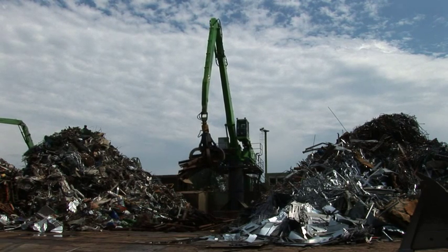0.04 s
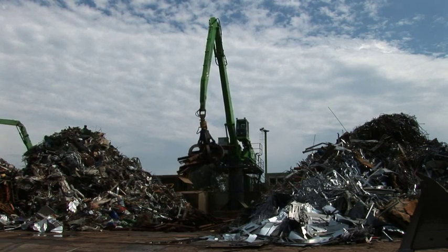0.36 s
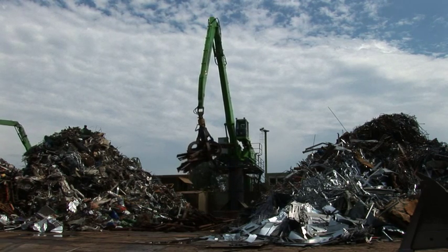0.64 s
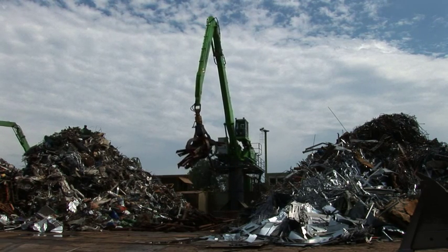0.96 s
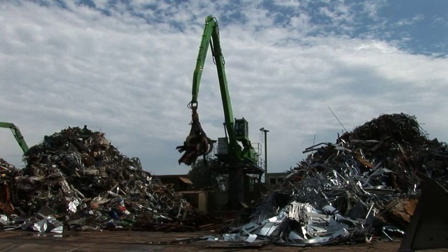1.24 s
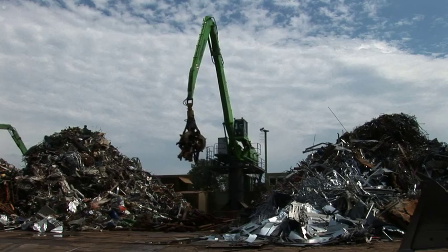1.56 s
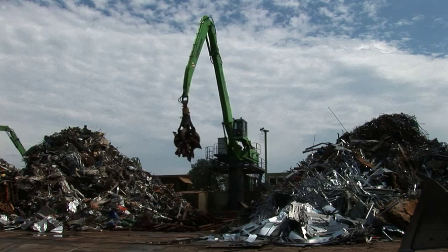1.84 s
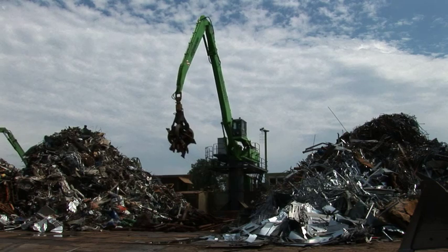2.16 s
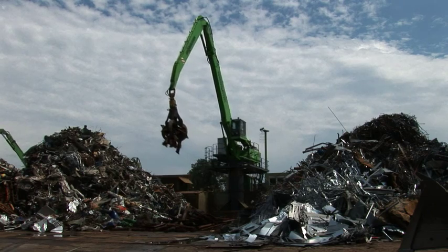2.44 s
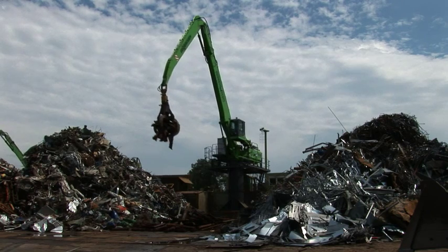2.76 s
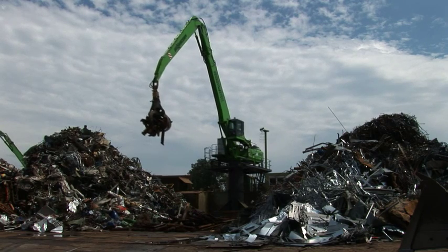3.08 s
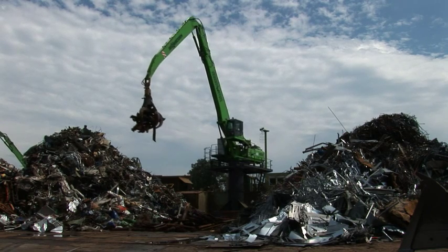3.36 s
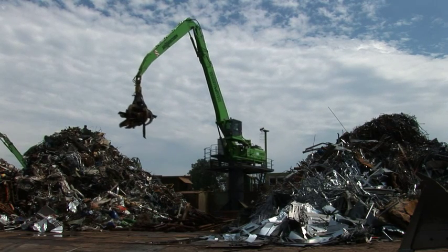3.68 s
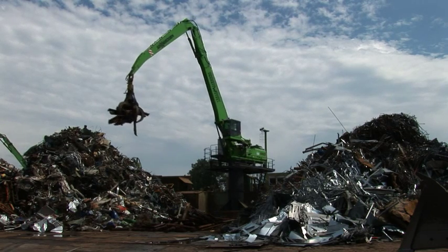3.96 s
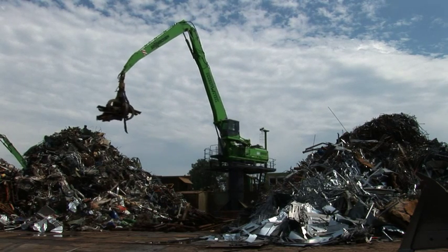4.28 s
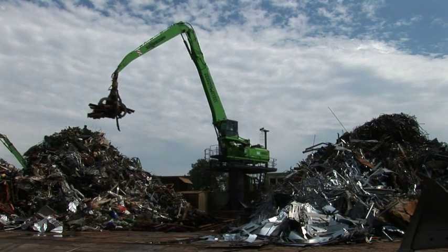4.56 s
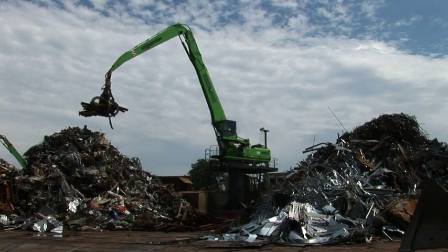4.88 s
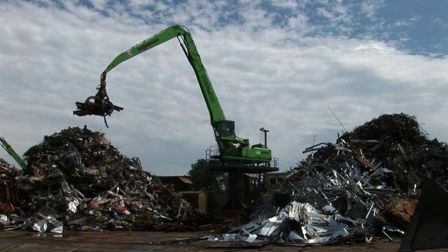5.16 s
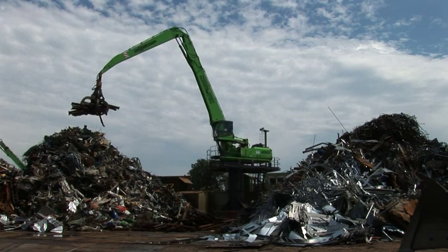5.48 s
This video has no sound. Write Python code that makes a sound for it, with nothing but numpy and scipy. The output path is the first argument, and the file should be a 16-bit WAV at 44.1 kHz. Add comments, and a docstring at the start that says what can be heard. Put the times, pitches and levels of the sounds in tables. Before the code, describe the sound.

Far-off scrap metal shifts with a few clanks and dull thuds over the steady low hum of a grab crane and the thin whine of its hydraulics. Then steel tumbles closer by, left of the microphone, building to a clattering crash with hollow knocks. The last pieces rattle and squeak into place while the machine keeps running in the open yard.

```python
"""Material handler in a scrapyard.

An electric handler swings its grab: the drive hums, the hydraulics whine. Scrap rustles far off,
then a nearer load on the left clanks, slides down in a long crash and settles. Random contacts
ring the modes of loose steel; the heaps scatter the sound to a closely spaced microphone pair."""
import sys
import numpy as np
from scipy import signal
from scipy.fft import rfft, irfft, next_fast_len
from scipy.io import wavfile
from scipy.ndimage import uniform_filter1d

SR = 44100
rng = np.random.default_rng(int(sys.argv[2]) if len(sys.argv) > 2 else 0)


def dump(signal):
    """Clip the signal to [-1, 1] and save it as 16-bit WAV at the path in sys.argv[1]."""
    limited = np.clip(np.atleast_2d(signal).T, -1, 1)
    pcm = np.round(limited * 32767).astype(np.int16)
    wavfile.write(sys.argv[1], SR, pcm)


N = 243431
TIME_S = np.arange(N) / SR
FFT_SIZE = next_fast_len(N + SR)
FREQ_HZ = np.arange(FFT_SIZE // 2 + 1) * SR / FFT_SIZE


def from_db(db):
    """Decibels to gain."""
    return 10 ** (np.asarray(db) / 20)


def unit_rms(x):
    """Scale to rms 1."""
    return x / np.sqrt(np.mean(x ** 2) + 1e-20)


def in_time(rows):
    """Each column of a curve at every sample."""
    time_s, *columns = np.transpose(rows)
    return [np.interp(TIME_S, time_s, c) for c in columns]


def in_frequency(rows):
    """Each column of a spectrum at every FFT bin."""
    hz, *columns = np.transpose(rows)
    return [np.interp(np.log(FREQ_HZ + 1), np.log(hz), c) for c in columns]


def filtered(x, response):
    """Apply a frequency response."""
    return irfft(rfft(x, FFT_SIZE) * response, FFT_SIZE)[..., :N]


def coloured(x, spectrum):
    """Shape x at unit power gain for white input; cut an octave above the last row."""
    level_db, = in_frequency(spectrum)
    return filtered(x, unit_rms(from_db(level_db) * (FREQ_HZ < spectrum[-1][0] * 2)))


def shelf(x, db, hz, kind):
    """Low or high shelf; its gain may vary in time."""
    band = signal.sosfiltfilt(signal.butter(2, hz, kind, fs=SR, output="sos"), x, padtype=None)
    return x + (from_db(db) - 1) * band


def add(out, start, sound):
    """Mix in from sample index start."""
    part = sound[..., :N - start]
    out[..., start:start + part.shape[-1]] += part


def drift(rate_hz):
    """Slow random wander, unit rms."""
    hop, warm_up = 40, 2000
    pole = np.exp(-2 * np.pi * rate_hz * hop / SR)
    noise = rng.standard_normal(N // hop + warm_up + 2)
    slow = signal.lfilter([1], [1, -2 * pole, pole * pole], noise)[warm_up:]
    return np.interp(np.arange(N) / hop, np.arange(len(slow)), unit_rms(slow))


def arch(start_s, length_s):
    """Rounded swell with a broad top."""
    progress = np.clip((TIME_S - start_s) / length_s, 0, 1)
    return np.sin(np.pi * progress).clip(0) ** 0.41


def tone(hz, db, waver_hz, flutter_db):
    """Sine wavering in pitch and level."""
    phase = 2 * np.pi * np.cumsum(hz + waver_hz * drift(9.9)) / SR
    return np.sqrt(2) * from_db(db + flutter_db * drift(19)) * np.sin(phase)


def microphones(pair, direction):
    """Shared and scattered signals to left and right."""
    coherence, lead_rad, balance_db = in_frequency(direction)
    # long waves reach both microphones alike and in phase
    coherence = np.clip(coherence, .99 / (1 + (FREQ_HZ / 480) ** 4), 1)
    lead_rad = lead_rad * np.minimum(FREQ_HZ / 440, 1) ** 4
    sides = np.array([[1], [-1]])
    ports = from_db(sides * balance_db / 2) * np.exp(sides * .5j * lead_rad) / np.sqrt(2)
    shared = filtered(pair[0], ports * np.sqrt(1 + coherence))
    scattered = filtered(pair[1], ports * sides * np.sqrt(1 - coherence))
    return shared + scattered


# pair response to the whole yard: (frequency [Hz], coherence [0-1], left lead [rad], left - right [dB])
FROM_YARD = [(275, 0.21, 4.5, 1), (446, 0.98, -0.46, -4.5), (510, 0.085, 0.3, 2.5), (800, 1, 2, 1),
             (950, 0.44, 1, 0.5), (1380, 0.45, 0, 1.5), (2030, 0.81, -1, 1.5), (2980, 1, 0, 0.5),
             (4050, 0.36, 1, -1), (4920, 0.77, 4.5, 1), (5660, 0.73, 3.5, 1.5), (8540, 0.9, 4, 0),
             (10300, 1, 0.5, 0), (13800, 0.48, -1.5, 0)]
# deep rumble, rumble body and din: (frequency [Hz], relative density [dB])
DEEP_SPECTRUM = [(15, -15), (28, -11), (48, 14), (68, 4), (95, 0)]
BODY_SPECTRUM = [(60, -44), (85, -1.5), (125, -0.5), (170, 3), (220, -2.5), (280, -5), (400, -11)]
DIN_SPECTRUM = [(150, -2), (350, 0.5), (700, 2), (1100, -0.5), (1800, -2.5), (3000, -8), (3700, -16),
                (5000, -21), (5900, -23), (7200, -39), (8800, -36), (11000, -39), (15000, -44)]
# rumble swells: (start [s], length [s], deep level [dB], body level [dB])
RUMBLE_SWELLS = [(0.237, 0.83, -60, -35), (1.275, 0.33, -56, -36), (2.948, 0.59, -38, -35),
                 (3.56, 0.34, -60, -35), (4.399, 0.25, -46, -33), (5.142, 0.21, -41, -56)]


def rumble(deep_db=-61, body_db=-38, din_db=-33):
    """Machinery rumble, swelling now and then under the steady din of the yard."""
    deep_power, body_power = from_db(deep_db) ** 2, from_db(body_db) ** 2
    for start_s, length_s, deep_swell_db, body_swell_db in RUMBLE_SWELLS:
        swell = arch(start_s, length_s)
        deep_power += (from_db(deep_swell_db) * swell) ** 2
        body_power += (from_db(body_swell_db) * swell) ** 2
    deep = np.sqrt(deep_power) * coloured(rng.standard_normal((2, N)), DEEP_SPECTRUM)
    body = np.sqrt(body_power) * coloured(rng.standard_normal((2, N)), BODY_SPECTRUM)
    din = from_db(din_db + .7 * drift(1.5)) * coloured(rng.standard_normal((2, N)), DIN_SPECTRUM)
    return microphones(deep + body + din, FROM_YARD)


# high whistle: (time [s], level [dB])
WHISTLE_LEVEL = [(0, -77), (.3, -73), (.5, -78), (1.0, -72), (1.7, -74), (1.85, -83), (2.45, -75),
                 (2.56, -69), (2.75, -77), (2.95, -68), (3.3, -81), (5.52, -70)]


def whistle(centre_hz=8714, half_width_hz=70):
    """Faint, airy band of noise that comes and goes."""
    level_db, = in_time(WHISTLE_LEVEL)
    band = unit_rms(1 / (1 + ((FREQ_HZ - centre_hz) / half_width_hz) ** 2))
    return from_db(level_db + 3.9 * drift(9)) * filtered(rng.standard_normal(N), band)


# drive speed: (time [s], hum frequency [Hz])
DRIVE_SPEED = [(0, 56.64), (.4, 59.2), (1, 61.95), (2, 63.5), (2.7, 64.4), (3.4, 66.7), (4.2, 65.4),
               (5.5, 65.5)]
# drive load: (time [s], hum level [dB])
DRIVE_LOAD = [(0, -42), (.25, -43), (.4, -37.5), (.86, -35.5), (1.1, -40.5), (1.8, -43.5), (2.08, -34),
              (2.3, -38), (2.95, -36.5), (3.08, -43), (3.55, -36.5), (3.7, -51), (4.6, -48), (5.52, -50)]
# upper drive tones: (time [s], drone level [dB], gear level [dB])
DRIVE_TONES = [(0, -58, -62), (.9, -51, -50), (1.05, -38.5, -44.5), (1.3, -45, -46), (1.5, -40, -40.5),
               (1.7, -41.5, -44), (2.1, -40.5, -49.5), (2.9, -41, -44.5), (4.0, -47.5, -50),
               (4.85, -43.5, -53), (5.15, -52, -43), (5.52, -50, -45.5)]
# second motor sags, picks up, drops out, runs again: (time [s], frequency [Hz], level [dB])
SECOND_MOTOR = [(0, 130, -36), (.09, 117.2, -37.5), (.22, 115, -44), (.31, 129.6, -39), (.5, 131, -36.5),
                (.68, 130, -46), (.95, 126.3, -51), (3.15, 132.7, -48), (3.28, 131, -39), (3.45, 123, -38),
                (3.7, 126, -50)]


def handler(gear_ratio=3.42, drone_hz=104):
    """Electric drive hum, a gear tone tied to its speed, a drone and a second motor."""
    speed_hz, = in_time(DRIVE_SPEED)
    hum_db, = in_time(DRIVE_LOAD)
    drone_db, gear_db = in_time(DRIVE_TONES)
    motor_hz, motor_db = in_time(SECOND_MOTOR)
    hum = tone(speed_hz, hum_db, waver_hz=1.7, flutter_db=2) * (1 + 0.23 * drift(35))
    gear = tone(gear_ratio * speed_hz, gear_db, waver_hz=2.24, flutter_db=2.5)
    drone = tone(drone_hz, drone_db, waver_hz=3.58, flutter_db=1.5)
    motor = tone(motor_hz, motor_db, waver_hz=1.2, flutter_db=1.2)
    return hum + gear + drone + motor


# valve and pump tones: (time [s], level [dB])
VALVE_LEVEL = [(0, -50), (1.35, -49), (1.55, -41), (1.92, -44), (2.08, -40), (2.3, -36), (2.52, -40),
               (2.68, -54), (2.85, -44.5), (3.3, -36), (3.9, -46), (4.8, -52), (5.25, -43.5), (5.39, -49),
               (5.46, -42), (5.52, -43)]
PUMP_LEVEL = [(0, -43), (0.8, -43.5), (1.1, -49.5), (1.7, -51), (1.95, -47), (2.5, -47.5), (2.8, -44),
              (3.15, -37), (3.35, -45.5), (3.54, -34.5), (3.68, -35), (4.0, -48), (4.45, -47), (4.66, -42),
              (4.74, -35.5), (4.98, -36), (5.32, -40.5), (5.42, -58), (5.52, -58)]


def hydraulics(valve_hz=1690, pump_hz=294.9):
    """Valve and pump sing as oil flows to move the boom."""
    valve_db, = in_time(VALVE_LEVEL)
    pump_db, = in_time(PUMP_LEVEL)
    valve = tone(valve_hz, valve_db, waver_hz=3, flutter_db=0.8)
    pump = tone(pump_hz, pump_db, waver_hz=1.5, flutter_db=1.2)
    return valve + pump


def yard(echo_db, t60_s=1):
    """Two impulse responses: direct sound with echoes off the heaps, and scatter alone."""
    t = TIME_S[:SR // 2]
    paths = rng.standard_normal((2, len(t))) * (rng.random((2, len(t))) < .05)
    paths *= from_db(-60 * t / t60_s) + 3 * np.exp(-t / 0.0084)  # tail + early echoes
    paths /= np.sqrt(np.sum(paths ** 2, axis=1, keepdims=True))
    direct, echo_gain = t == 0, from_db(echo_db)
    paths[0] = (direct + echo_gain * paths[0]) / np.sqrt(1 + echo_gain ** 2)
    return paths


def across_yard(contacts, response, echo_db):
    """Contacts on one piece, carried across the yard."""
    return signal.fftconvolve(contacts[None], signal.fftconvolve(response[None], yard(echo_db)))


def struck_modes(hz, db, t60_s):
    """Sum of decaying sines of random sign, unit energy."""
    t = TIME_S[:SR // 3, None]
    signs = rng.choice([-1, 1], len(hz))
    blow = np.sum(signs * from_db(db - 60 * t / t60_s) * np.sin(2 * np.pi * hz * t), axis=1)
    return blow / np.sqrt(np.sum(blow ** 2))


# heavy steel in the heap: (frequency [Hz], relative level [dB], T60 [s])
STEEL_MODES = [(387, -0.5, 0.2), (590, 2, 0.4), (683.5, 7, 0.21), (995, -2, 0.36), (1118, 6.5, 0.27),
               (1233, 4, 0.27), (1366, 6, 0.22), (1668, 5.5, 0.2), (1820, -1, 0.33), (2020, 6.5, 0.21),
               (2176, 2.5, 0.63), (2336, 5, 0.45), (2630, -8, 0.073), (2860, 6, 0.16), (3276, -0.5, 0.67)]


def piece(steel_db, own_db, own_t60_s, modes=56):
    """Impulse response of a piece: a crack, its own modes and the heavy steel under it."""
    hz = np.geomspace(800, 12000, modes) * from_db(rng.uniform(-.4, .4, modes))
    mode_db = 10 * np.log10(np.minimum(hz, 3000) / 1000) + rng.normal(0, 1.9, modes)
    t60_s = own_t60_s / (1 + (hz / 3500) ** 2)
    heap_hz, heap_db, heap_t60_s = np.transpose(STEEL_MODES)
    detune = 1 + rng.normal(0, .011, len(heap_hz))  # from the weight lying on the steel
    heap_db = heap_db + rng.normal(0, 2.1, len(heap_hz))
    response = from_db(own_db) * struck_modes(hz, mode_db, t60_s)
    response += from_db(steel_db) * struck_modes(heap_hz * detune, heap_db, heap_t60_s)
    response[0] = 1  # crack
    return response / np.sqrt(np.sum(response ** 2))


def tumbling(per_s, spread_db):
    """Random contacts of uneven force, levelled to a mean power of 1."""
    force = from_db(spread_db * np.minimum(rng.exponential(1, N), 4)) * rng.choice([-1, 1], N)
    contacts = force * (rng.random(N) < per_s / SR)
    local_power = np.abs(uniform_filter1d(contacts ** 2, size=2600))
    return contacts / np.sqrt(local_power + 1e-6)


def motion(slides):
    """Slides gather way, run and settle; returns force and power-weighted heavy and grit gains."""
    start_s, length_s, db, heavy_db, grit_db = np.transpose(slides)[:, :, None]
    rise_s, settle_s = 0.19 * length_s, 0.15 + 0.16 * length_s
    rise = np.clip((TIME_S - start_s) / rise_s, 0, 1)
    settle = np.exp(-np.maximum(TIME_S - start_s - length_s, 0) / settle_s)
    power = (from_db(db) * rise * settle) ** 2
    total = power.sum(axis=0)
    share = power / (total + 1e-20)
    return np.sqrt(total), np.sum(share * heavy_db, axis=0), np.sum(share * grit_db, axis=0)


def scrap(contacts, heavy_db, grit_db, spectrum, steel_db, own_db, own_t60_s, echo_db, pieces=16):
    """Contacts dealt to loose pieces; heavy parts set the lows, grit the highs."""
    owner = rng.integers(0, pieces, N)
    sound = np.zeros((2, N))
    for k in range(pieces):
        response = piece(steel_db, own_db, own_t60_s)
        add(sound, 0, across_yard(contacts * (owner == k), response, echo_db))
    sound = shelf(coloured(sound, spectrum), heavy_db, 1600, "low")
    return shelf(sound, grit_db, 6500, "high")


# far drags: (start [s], length [s], level [dB], heavy parts [dB], grit [dB])
FAR_DRAGS = [(.26, 0.42, -27.5, -1, 5.5), (.93, 0.18, -31, 0.5, 7.5), (1.22, 0.13, -29.5, 0, 8),
             (1.69, 0.11, -32, -0.5, 0)]
# far scrap: (frequency [Hz], relative gain [dB])
FAR_SPECTRUM = [(120, -12), (220, -14), (430, 7), (740, 6.5), (870, 0), (1150, 4.5), (1500, 0.5),
                (2000, 0.5), (3000, -7.5), (3700, -15.5), (5000, -19), (5900, -24.5), (7200, -41),
                (15000, -49)]


def far_scrap():
    """Light scrap dragged about behind the heaps."""
    force, heavy_db, grit_db = motion(FAR_DRAGS)
    contacts = tumbling(per_s=810, spread_db=0) * force
    rustle = scrap(contacts, heavy_db, grit_db, FAR_SPECTRUM,
                   steel_db=-10.5, own_db=-7, own_t60_s=0.3, echo_db=1.5)
    return microphones(rustle, FROM_YARD)


def resonance(drive, hz, width_hz):
    """Broad resonance: shift to 0 Hz, low-pass, shift back; unit rms."""
    carrier = np.exp(2j * np.pi * hz * TIME_S)
    pole = np.exp(-np.pi * width_hz / SR)
    baseband = signal.lfilter([1], [1, -2 * pole, pole * pole], drive / carrier + 1e-18)
    return unit_rms((carrier * baseband).real)


# dropping lumps: (start [s], level [dB], frequency [Hz])
LUMP_DROPS = [(0.4, -32, 427), (0.415, -31.5, 159), (.555, -30.5, 294), (.565, -27.5, 450), (3.6, -30, 372),
              (4.159, -36.5, 302)]


def thuds(length_s=0.076):
    """Heavy lumps hit the heap with a short, dull boom."""
    contacts = tumbling(per_s=900, spread_db=1)
    return sum(from_db(db) * arch(start_s, length_s) * resonance(contacts, hz, width_hz=120)
               for start_s, db, hz in LUMP_DROPS)


# edges slipping as the load settles: (start [s], length [s], frequency [Hz], level [dB])
EDGE_SLIPS = [(4.45, 0.12, 2000, -37), (4.94, 0.1, 2670, -42), (5.14, 0.14, 3310, -43),
              (5.36, 0.065, 2343, -38.5)]


def squeals():
    """An edge slipping over steel holds one mode singing."""
    return sum(arch(start_s, length_s) * tone(hz, db, waver_hz=4, flutter_db=1.2)
               for start_s, length_s, hz, db in EDGE_SLIPS)


# near load slips, crashes, settles: (start [s], length [s], level [dB], heavy parts [dB], grit [dB])
NEAR_SLIDES = [(2.89, 0.092, -34, 7.5, 5), (3.08, 0.093, -29, 0, 11), (3.23, 0.73, -22.5, 2.5, 7),
               (4.2, 0.057, -29.5, -0.5, 1), (4.48, 0.097, -27.5, -6, 9), (4.77, 0.053, -31, 0, -12),
               (5.04, 0.014, -31.5, -4, 5), (5.23, 0.057, -34.5, -30, 11)]
# near scrap: (frequency [Hz], relative gain [dB])
NEAR_SPECTRUM = [(180, -10), (300, -6.5), (430, -3), (530, 4), (645, -1), (760, 0), (890, -1), (1700, -0.5),
                 (2800, -4), (3700, -14.5), (4900, -19.5), (5900, -18.5), (7200, -39.5), (10500, -41.5),
                 (15000, -56)]


def slide():
    """The harder the near load slides, the more pieces collide."""
    force, heavy_db, grit_db = motion(NEAR_SLIDES)
    contacts = tumbling(per_s=380 * (force / from_db(-30)) ** .5, spread_db=3.5) * force
    return scrap(contacts, heavy_db, grit_db, NEAR_SPECTRUM,
                 steel_db=-12, own_db=-8, own_t60_s=0.17, echo_db=5)


def strike(rise_s, decay_s):
    """Envelope of a blow: linear rise, exponential decay."""
    t = TIME_S[:SR // 4]
    return np.minimum(t / rise_s, 1) * np.exp(-np.maximum(t - rise_s, 0) / decay_s)


def ring(hz, db, rise_s, decay_s):
    """One mode set ringing by a blow."""
    phase = 2 * np.pi * (hz * TIME_S[:SR // 4] + rng.random())
    return np.sqrt(2) * from_db(db) * strike(rise_s, decay_s) * np.sin(phase)


# hollow piece under steady battering: (frequency [Hz], width [Hz], level re slide force [dB])
HOLLOW_BANDS = [(517.7, 115, -5), (735, 74, -6.5), (1660, 36, -10.5)]
# knocks on it: (start [s], low mode [Hz], its level [dB], high mode [Hz], its level [dB])
HOLLOW_KNOCKS = [(2.893, 490, -27.5, 689, -25.5), (2.935, 490, -37, 679, -21.5),
                 (2.994, 490, -40, 750, -23), (3.32, 485, -22.5, 665, -36), (3.385, 499, -20, 735, -17.5),
                 (3.432, 490, -23.5, 700, -16.5), (3.512, 554, -13, 729, -16), (3.618, 550, -16, 750, -18),
                 (3.662, 595, -13.5, 753, -21), (3.712, 518, -16.5, 750, -27), (3.785, 530, -20, 690, -25),
                 (3.838, 534, -15, 750, -19.5), (3.92, 521, -28, 761, -15), (3.985, 504, -27, 750, -20),
                 (4.075, 508, -23.5, 750, -24), (4.175, 529, -25, 750, -38), (4.24, 543, -33, 770, -31.5),
                 (4.395, 532, -25.5, 736, -28), (4.925, 502, -24.5, 750, -36)]


def hollow_piece(rise_s=0.013, decay_s=0.029):
    """A hollow piece in the load booms at each knock; its two modes shift as it bends."""
    force, _, _ = motion(NEAR_SLIDES)
    contacts = tumbling(per_s=440, spread_db=-0.5)
    shared = np.zeros(N)
    for hz, width_hz, db in HOLLOW_BANDS:
        shared += force * from_db(db) * resonance(contacts, hz, width_hz)
    for start_s, low_hz, low_db, high_hz, high_db in HOLLOW_KNOCKS:
        boom = ring(low_hz, low_db, rise_s, decay_s) + ring(high_hz, high_db, rise_s, decay_s)
        add(shared, int(start_s * SR), boom)
    return np.stack([shared, np.zeros(N)])  # no scattered part


# single pieces landing: (start [s], level [dB], heavy parts [dB], grit [dB], rise [s],
# rattle decay [s], ring frequency [Hz], ring level [dB])
LANDINGS = [(0.259, -27.5, -8, -14, .006, .03, 2700, -45), (0.295, -27.5, -20, 1, 0.011, 0.076, 1700, -33),
            (0.403, -28, -15, -7, 0.01, 0.053, 1750, -27.5), (.478, -27, -12, 6, 0.011, .028, 2430, -36),
            (0.543, -23, 8, 0, 0.017, .026, 1130, -23), (0.598, -36, 1, 0, .008, .02, 2940, -34),
            (1.742, -32, -1, 5, 0.0088, .03, 1690, -35), (2.897, -26, 10, -3, .012, .018, 1700, -35),
            (2.96, -38, 0, -5, .01, .015, 1704, -30), (2.997, -29, 2, -10, .008, .018, 1155, -28),
            (3.088, -23, 3, 10, 0.01, 0.025, 1700, -38), (3.134, -41, -10, 5, 0.0071, .015, 1700, -29),
            (3.164, -32.5, -3, 25.5, 0.0061, 0.017, 1120, -39), (3.263, -22, 3, -8, 0.021, .04, 2860, -35),
            (3.31, -23.5, -8, 10, 0.011, 0.031, 1690, -27), (3.387, -17, -1, 2, 0.013, 0.027, 1660, -19),
            (3.408, -24, -3, 6, 0.0067, .018, 2130, -19), (3.442, -19, -4, 4, 0.007, 0.012, 1660, -22),
            (3.51, -15, -6, 2, 0.015, 0.016, 1237, -24), (3.541, -26, 11, 0, .006, .009, 906, -21),
            (3.603, -16.5, -13, -3, .008, 0.028, 1380, -20.5), (3.64, -14.5, 2, 4, 0.0099, 0.03, 1646, -29),
            (3.685, -20, 8, 0, 0.0066, 0.029, 1060, -19.5), (3.757, -12, -9, -1, 0.0054, 0.021, 1233, -24),
            (3.802, -21, -4, 10, .008, 0.03, 1864, -21), (3.866, -16, 3, 1, 0.0087, 0.038, 2008, -21),
            (3.922, -22.5, 9, 5, 0.0065, 0.023, 2185, -25), (3.966, -23.5, 9, -6, 0.0076, 0.023, 1660, -29),
            (4.04, -20, 2, 5, 0.0084, .021, 1970, -24), (4.18, -30, 5, -5, .007, .02, 1240, -35),
            (4.225, -24.5, -6, -7, 0.0062, .016, 2200, -35), (4.39, -25, 3, 5, 0.007, 0.09, 1660, -31),
            (4.52, -25.5, -23, 13.5, 0.017, 0.05, 2336, -33), (4.575, -38, -7, 4, 0.0086, .02, 2450, -33),
            (4.618, -29, 11, -6, .01, 0.023, 1307, -29.5), (4.689, -26, -24, 11.5, .008, 0.064, 1836, -30),
            (4.777, -27.5, 2, -8, 0.0098, 0.016, 1627, -28), (4.914, -20.5, 0, 7.5, 0.02, 0.019, 1816, -31),
            (5.116, -22.5, -17, 5, 0.027, 0.017, 1955, -30.5)]


def clanks():
    """A piece lands with a short rattle of contacts, and one mode rings out."""
    rattle = tumbling(per_s=3200, spread_db=1.2)
    crashes, rings = np.zeros((2, 2, N))
    pad = SR // 100  # room for the shelves to spread the onset
    for start_s, db, heavy_db, grit_db, rise_s, rattle_s, ring_hz, ring_db in LANDINGS:
        start = int(start_s * SR)
        burst = rattle[start:start + SR // 4] * strike(rise_s, rattle_s)
        burst = shelf(np.pad(burst, (pad, 0)), heavy_db, 850, "low")
        burst = shelf(burst, grit_db, 6500, "high")
        response = piece(steel_db=-25, own_db=-8.5, own_t60_s=0.22)
        add(crashes, start - pad, from_db(db) * across_yard(burst, response, echo_db=-7))
        add(rings[0], start, ring(ring_hz, ring_db, rise_s, decay_s=0.026))
    return coloured(crashes, NEAR_SPECTRUM) + rings


# pair response to the left: (frequency [Hz], coherence [0-1], left lead [rad], left - right [dB])
FROM_LEFT = [(202, 0.9, 7, 0), (405, 0.4, 0, -1), (490, 1, 1.5, 0), (624, 0.07, 2, 4.5),
             (750, 0.9, 1.93, 6.5), (810, 0.6, 2.5, 5.5), (990, 0.35, .5, 2), (1500, 0.44, 0.62, 3.5),
             (1990, 0.75, -0.2, 4), (3050, 0.87, -0.12, 1.5), (3360, 1, 0.7, -0.5), (3670, 0, 4, -3),
             (4340, 0.84, 2, 0), (5250, 0, 4.5, 1), (5130, 1, 3.5, 3.5), (5960, 0.83, 3.5, 3),
             (8330, 1, 4, 0), (8800, 0, 7, 2), (10800, 1, -2.5, 2), (12200, .3, 1.5, 8.5)]


def scene():
    """Machine ahead, scrap far off and near on the left."""
    near = microphones(slide() + clanks() + hollow_piece(), FROM_LEFT)
    return handler() + hydraulics() + whistle() + rumble() + far_scrap() + thuds() + squeals() + near


def record(dry):
    """Soft limiter, short end fades, steep low-pass."""
    ceiling, fade_s, cutoff_hz = .93, .003, 14800
    limited = dry / (1 + (dry / ceiling) ** 6) ** (1 / 6)
    fades = np.clip(np.minimum(TIME_S, TIME_S[::-1]) / fade_s, 0, 1)
    low_pass = signal.ellip(10, .2, 80, cutoff_hz, fs=SR, output="sos")
    return signal.sosfilt(low_pass, limited * fades)


dry = scene()
out = record(dry)
dump(out)
```